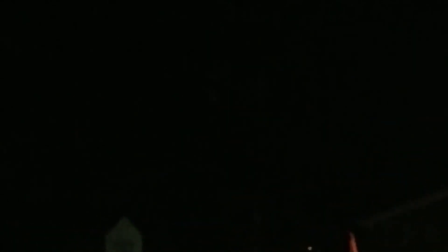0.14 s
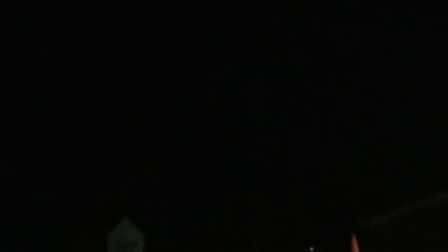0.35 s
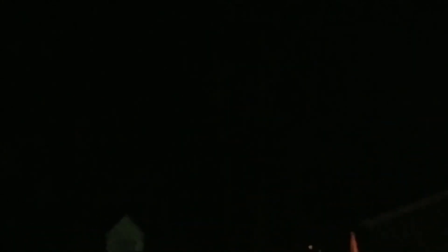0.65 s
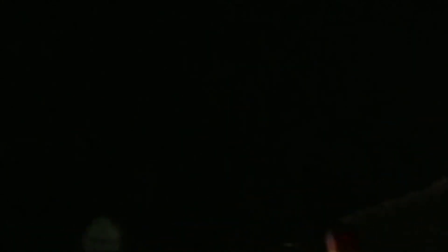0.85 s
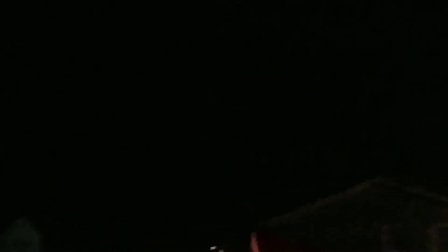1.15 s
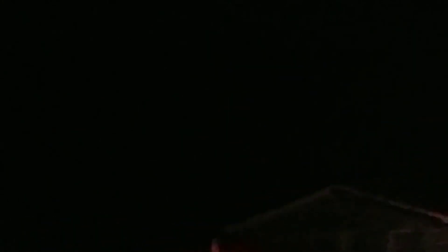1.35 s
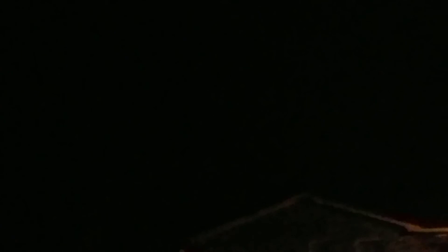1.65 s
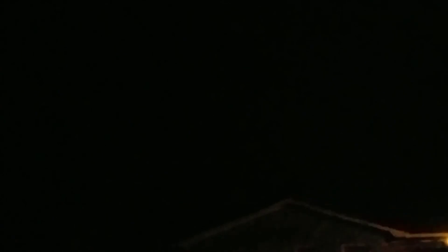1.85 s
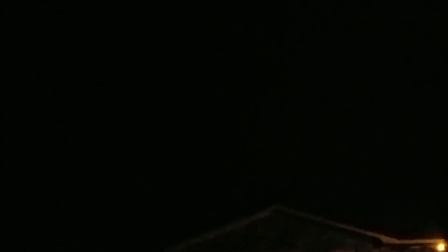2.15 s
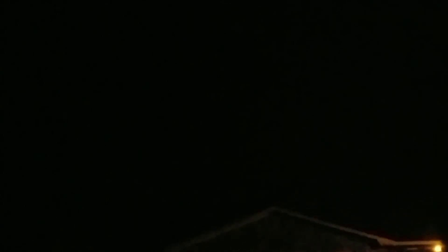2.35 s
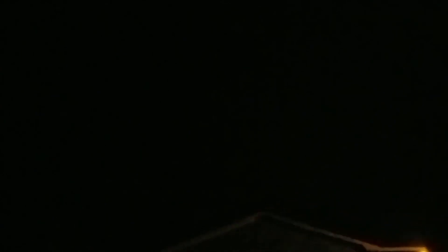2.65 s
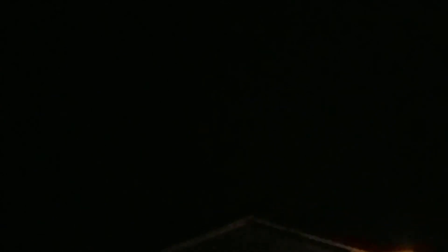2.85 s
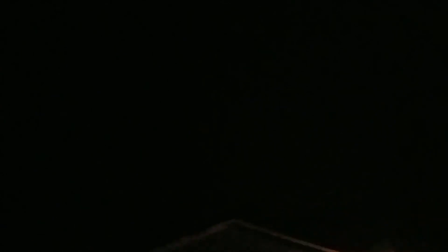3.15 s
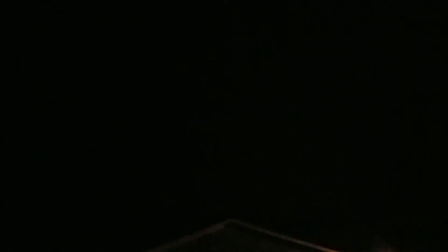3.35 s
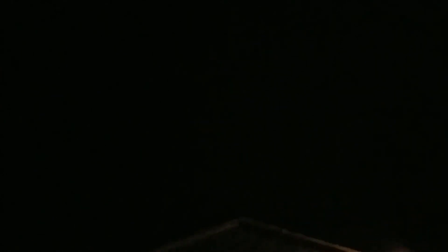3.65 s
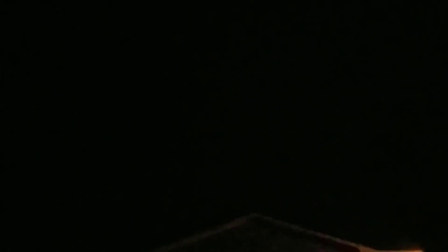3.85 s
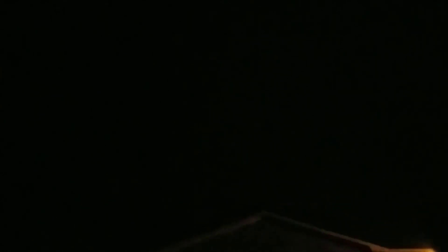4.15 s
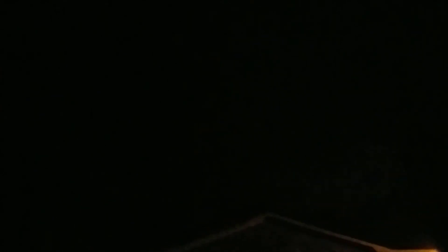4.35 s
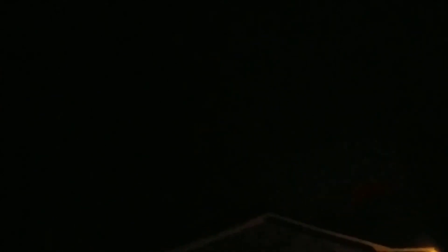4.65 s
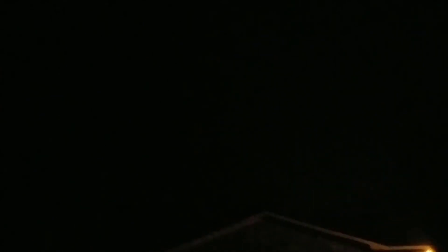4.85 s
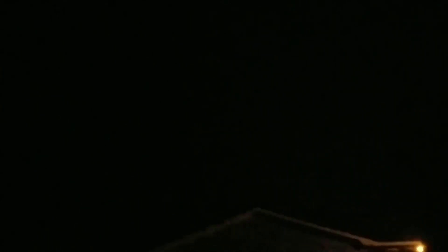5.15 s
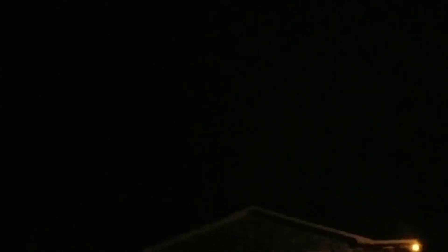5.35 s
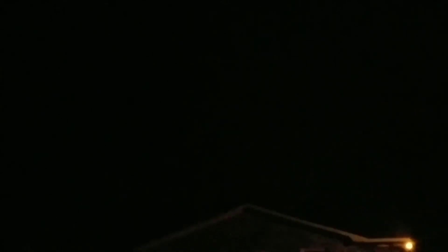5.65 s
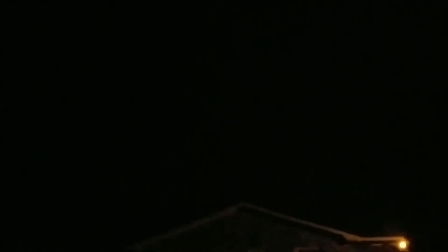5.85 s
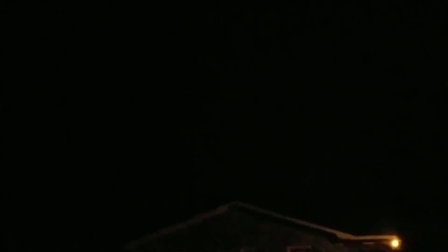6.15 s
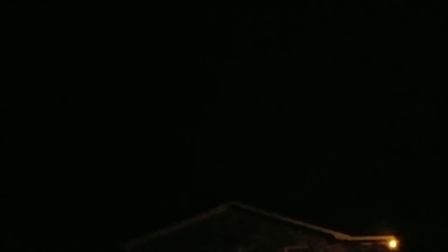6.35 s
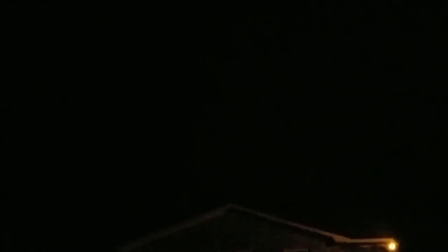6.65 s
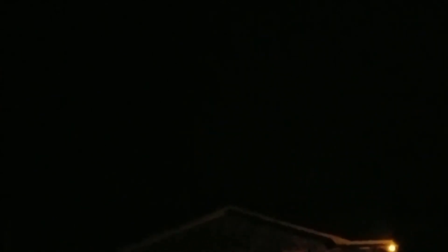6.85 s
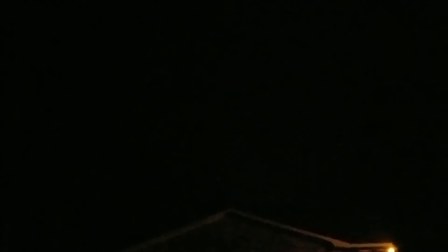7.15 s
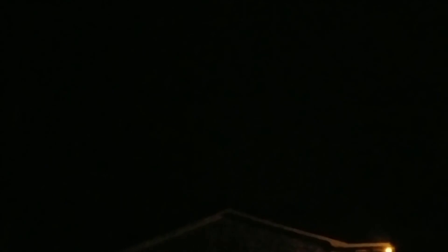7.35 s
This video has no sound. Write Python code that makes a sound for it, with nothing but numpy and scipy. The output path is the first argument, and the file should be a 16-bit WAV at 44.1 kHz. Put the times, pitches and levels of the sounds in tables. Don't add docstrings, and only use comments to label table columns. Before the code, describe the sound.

Night crickets and katydids pulse over a low hum and leaf hiss; two violent thunder cracks burst close by, with short rolling echoes.

```python
import sys
import numpy as np
from scipy import signal
from scipy.fft import rfft, irfft, next_fast_len
from scipy.io import wavfile

SR = 44100
rng = np.random.default_rng(int(sys.argv[2]) if len(sys.argv) > 2 else 0)


def volts(x):
    e = np.asarray(x, float) / 20
    return 10 ** e


def store_wav(level_fs):
    pcm = np.round(np.clip(np.atleast_2d(level_fs), -1, 1) * 32767)
    wavfile.write(sys.argv[1], SR, pcm.T.astype(np.int16))


N = 331191

# start_s, level_db
HUM_LEVEL = [(0.0, -44.5), (.45, -42.5), (1.1, -45.5), (1.75, -40), (2.15, -43), (2.45, -41), (2.85, -45.5),
             (3.3, -42.5), (5.5, -45.5), (6.8, -40.5), (7.2, -46.5), (7.51, -42)]
# frequency_hz, density_db (per Hz)
HUM_COLOUR = [(15, -49), (25, -13), (48, -15), (118, 1), (151, -8), (221, -11), (260, -16), (332, -20),
              (360, -25), (400, -27), (520, -66), (880, -120)]
# frequency_hz, density_db (per Hz)
HISS_COLOUR = [(200, -14.5), (380, -7.5), (760, -7), (1100, -8.5), (1500, -15), (2200, -13), (3600, -21.5),
               (4400, -28.5), (5500, -35.5), (6200, -21), (7900, -54.5), (8700, -24.5), (9500, -30),
               (15800, -27.5)]
# frequency_hz, likeness (-1 to 1)
NIGHT_LIKENESS = [(60, 0.97), (130, 1), (290, 0.89), (640, 0.68), (1410, 0.36), (3100, 0.33), (6820, 0.16),
                  (15000, .1)]
# pitch_hz, width_hz, level_db
MOTOR_DRONES = [
    (226.2, 19, -61.5),
    (333.3, 12, -65.5),
]
# start_s, level_db
MOTOR_PASSING = [
    (0, -1),
    (.5, 2.5),
    (1.9, 7),
    (2.4, -18),
    (3.0, -30),
]
# start_s, chirps_so_far (count)
CHIRPS = [
    (.005, 0),
    (3.98, 15),
    (7.47, 29),
    (7.72, 30),
]
# start_s, dip_db between chirps (deep when all keep time), octave_db of the nearest cricket
CHORUS = [(0, 2, -66), (.9, 4.5, -68.5), (1.5, 5, -71), (2.2, 3, -72), (2.75, 2.5, -68), (3.6, 3.5, -69),
          (5.3, 9, -77), (6.0, 4.5, -84), (7.0, 8.5, -78), (7.51, 7.5, -76)]
# start_s (middle of swell), level_db over their steady buzz
BUZZ_SWELLS = [(.03, 4.0), (.35, 2.5), (.8, 3.0), (1.07, 2.5), (1.43, 5), (1.92, 3.0), (2.13, 4.0),
               (2.35, 3.5), (2.7, 3), (3.1, 2.5), (3.34, 2), (4.5, 3), (4.7, 3), (6.231, 6.5), (6.75, 3.0),
               (7.21, 7)]
# start_s, length_s, level_db at the end, pitch_hz
RASP_PHRASES = [
    (-.4, 0.84, -77, 11200),
    (.7, 1.06, -73, 11050),
    (1.87, .2, -74, 11300),
    (2.33, 1.04, -80, 12300),
    (4.3, .55, -72, 11700),
    (5.5, 1.2, -72, 11200),
    (6.7, .9, -72.5, 11060),
]
# start_s, peak_db, length_s, softness_hz (top of the spectrum)
BLASTS = [
    (3.6596, 1.0, .0046, 2500),
    (4.8213, -.5, .0046, 1250),
]
# delay_s, level_db, left_lag_ms, dullness (factor on softness)
NEAR_ECHOES = [
    (0, -0.5, 0.41, 1.0),
    (.0054, -14, -0.047, 0.71),
    (.0094, -20, -0.12, 1),
    (0.0142, -6, -0.0068, 0.7),
    (0.021, -12, .05, .5),
    (.0290, -14, 0.31, 0.18),
]
# delay_s, level_db, left_lag_ms, dullness (factor on softness)
FAR_WALLS = [
    (0.084, -20, 0.2, 0.54),
    (0.121, -28, 0.26, 0.73),
    (0.154, -26, -.2, 0.57),
    (0.327, -33, 0.13, .4),
    (.395, -36, -.1, .4),
]
# frequency_hz, density_db (per Hz)
ROLL_COLOUR = [(20, -39.5), (40, -19), (97, -3), (150, -4.5), (200, -3), (320, -8.5), (450, -20),
               (640, -9.5), (950, -22), (1700, -25), (3800, -33.5), (6500, -51), (11000, -53), (15000, -57)]
# frequency_hz, likeness (-1 to 1)
ROLL_LIKENESS = [(60, 0.98), (130, 0.96), (290, 0.92), (640, 0.58), (1410, -0.26), (3100, -0.46),
                 (6820, 0.92), (15000, -0.14)]
ROLL_EDGES = [300, 1003, 2280]
# first_db, fall_db_per_s, rumble_db, rumble_fall_db_per_s, gather_s, wall_burst_db
ROLL_BANDS = [
    (-20, 57.5, -40, 6.5, 0.036, -20),
    (-20.5, 86, -47.5, 6.5, 0.005, 3),
    (-26, 66, -46.5, 10.5, 0.0017, -1.5),
    (-40, 81, -80, -1, 0.0089, 1),
]
# first_db, rumble_db, hills_db
ROLL_STRENGTH = [
    (1, -0.5, -2),
    (0, 2.5, -20),
]
# frequency_hz, density_db (per Hz)
SWELL_COLOUR = [(300, -11.5), (500, -10.5), (780, -5), (1100, -6.5), (1500, -7), (2100, -3.5), (2800, -16),
                (4500, -27), (7000, -53), (14000, -55)]
DUCK_DB = [
    19,
    10,
]


def in_time(rows):
    s, *columns = np.transpose(rows)
    return [np.interp(np.arange(N) / SR, s, column) for column in columns]


def rms_one(x):
    return x / np.sqrt(np.mean(x ** 2) + 1e-20)


def at_hz(points, hz):
    table_hz, values = np.array(points).T
    return np.interp(np.log(hz + 1), np.log(table_hz), values)


def coloured(x, spectrum, lag_ms=0.):
    size = next_fast_len(N)
    hz = np.arange(size // 2 + 1) * SR / size
    delay = np.exp(-2j * np.pi * hz * lag_ms / 1000)
    return irfft(rfft(x, size) * volts(at_hz(spectrum, hz)) * delay, size)[..., :N]


def diffuse(mid, side, spectrum, likeness):
    hz, alike = np.clip(np.array(likeness), [1, -.99], [SR, .99]).T
    mid = coloured(coloured(mid, spectrum), np.c_[hz, 10 * np.log10(1 + alike)])
    side = coloured(coloured(side, spectrum), np.c_[hz, 10 * np.log10(1 - alike)])
    return np.array([mid + side, mid - side]) / np.sqrt(2)


def drift(rate):
    r = np.exp(-80 * np.pi * rate / SR)
    slow = signal.lfilter([1], [1, -2 * r, r * r], rng.standard_normal(N // 40 + 2002))[2000:]
    return np.interp(np.arange(N) / 40, np.arange(len(slow)), rms_one(slow))


def night():
    hiss_db, hum_lag_ms = -53, .18
    white = rng.standard_normal((4, N))
    hum = rms_one(diffuse(white[0], white[1], HUM_COLOUR, NIGHT_LIKENESS))
    hum *= volts(in_time(HUM_LEVEL)[0] + 1.04 * drift(5.3))
    hiss = rms_one(diffuse(white[2], white[3], HISS_COLOUR, NIGHT_LIKENESS))
    hiss *= volts(hiss_db + 0.6 * drift(7.4))
    left, right = hum * volts([[-.4], [.4]]) + hiss
    return np.array([np.roll(left, round(hum_lag_ms * SR / 1000)), right])


def singers(hz, spread_hz, pulses_per_s, duty, wobble_hz, count):
    out = np.zeros((2, N))
    for place in np.linspace(-1, 1, count):
        rate, lag, pan = rng.normal(0, 1, 3)
        turn = 2 * np.pi * np.cumsum(hz + spread_hz * place + wobble_hz * drift(80)) / SR
        pulse_rate = pulses_per_s * (1 + 0.074 * rate + 0.05045 * drift(4.78))
        beat = np.cumsum(pulse_rate) / SR % 1
        stroke = np.sin(np.pi * np.clip(beat / duty, 0, 1)) * volts(1.14 * drift(1.75))
        tone = np.sin([turn, turn + 3 * lag + 1.12 * drift(22)])
        out += stroke * tone * volts([[2.8 * pan], [-1.5 * pan]])
    return rms_one(out)


def crickets():
    cricket_db, octave_lead, octave_dip_db = -56, .08, 19.5
    (chirp,), (dip_db, octave_db) = in_time(CHIRPS), in_time(CHORUS)
    level_db = cricket_db - dip_db * np.sin(np.pi * chirp) ** 2
    octave_db = octave_db - octave_dip_db * np.sin(np.pi * (chirp + octave_lead)) ** 2
    chorus = volts(level_db + 4) * volts([[1.5], [-1.5]]) * singers(7021, 260, 44, 1.0, 110, count=7)
    nearest = volts(octave_db + 2) * volts([[1], [-1]]) * singers(13950, 60, 44, 1, 60, count=3)
    others = volts(level_db - 16.5) * singers(14300, 450, 44, 1.0, 300, count=3)
    return chorus + nearest + others


def low_katydids():
    buzz_db, swell_s, t = -59.0, 0.039, np.arange(N) / SR
    level_db = buzz_db + sum(db * np.exp(-.5 * ((t - s) / swell_s) ** 2) for s, db in BUZZ_SWELLS)
    return volts(level_db + 2.5) * singers(2718, 240, 128, 0.95, 170, count=6)


def trill():
    return volts(-65) * singers(4692, 170, 60, 0.93, 82, count=5)


def high_katydids():
    growth_db, edge_s, t = 3, 0.034, np.arange(N) / SR
    gain, pitch_hz = np.zeros(N), np.full(N, RASP_PHRASES[0][3], float)
    for s, length, db, hz in RASP_PHRASES:
        left_s = s + length - t
        edges = np.clip(np.minimum(t - s, left_s) / edge_s, 0, 1)
        gain += edges * volts(db - growth_db * np.clip(left_s / length, 0, 1))
        pitch_hz[t >= s] = hz
    return gain * volts(3.0) * singers(pitch_hz, 300, 150, 0.92, 400, count=4)


def motor():
    out = np.zeros(N)
    for hz, width_hz, level_db in MOTOR_DRONES:
        r, tone = np.exp(-np.pi * width_hz / SR), rng.standard_normal(N)
        for stage in range(2):
            tone = signal.lfilter([1, 0, -1], [1, -2 * r * np.cos(2 * np.pi * hz / SR), r * r], tone)
        out += volts(level_db) * rms_one(tone)
    return out * volts(in_time(MOTOR_PASSING)[0])


def n_wave(phase):
    suck = 1.7 * np.sin(np.pi * phase.clip(0, 1) ** 1.3) ** 2 * phase
    wave = 1 - 1.6 * phase - suck + .6 * phase ** 4
    return np.where((phase > 0) & (phase < 1), wave, 0)


def blasts():
    out, t = np.zeros((2, N)), np.arange(800) / SR
    for s, peak_db, length, soft_hz in BLASTS:
        for delay, echo_db, lag_ms, dull in NEAR_ECHOES + FAR_WALLS:
            at = round((s + delay) * SR)
            smooth = signal.butter(3, np.clip(soft_hz * dull, 100, 9000), fs=SR, output="sos")
            for channel, late_ms in enumerate([max(lag_ms, 0), max(-lag_ms, 0)]):
                wave = n_wave((t - late_ms / 1000) / length)
                out[channel, at:at + len(t)] += volts(peak_db + echo_db) * signal.sosfilt(smooth, wave)
    return out


def yard(x):
    ring_hz, width_hz, ring_db = 654, 59, 9
    r = np.exp(-np.pi * width_hz / SR)
    poles = [1, -2 * r * np.cos(2 * np.pi * ring_hz / SR), r * r]
    ring = signal.lfilter(np.array([1, 0, -1]) * (1 - r * r) / 2, poles, x + 1e-18)
    return x + volts(ring_db) * ring


def roll_level(t, first_db, fall, rumble_db, rumble_fall, gather, wall_db):
    hills_delay_s, hills_spread_s, hills_over_rumble_db = 0.778, 0.063, -4.5
    surge_s, surge_rise_s = 0.0058, 0.0016
    power = 0
    for blast, (strong_db, linger_db, hills_db) in zip(BLASTS, ROLL_STRENGTH):
        since = np.maximum(t - blast[0], 0)
        hills = np.exp(-.5 * ((since - hills_delay_s) / hills_spread_s) ** 2)
        hills *= volts(hills_over_rumble_db + hills_db)
        rumble = volts(rumble_db + linger_db - rumble_fall * since) * (1 + hills)
        late = [np.maximum(since - wall[0], 0) for wall in FAR_WALLS]
        bursts = sum((1 - np.exp(-u / surge_rise_s)) * np.exp(-u / surge_s) for u in late)
        onset = (1 + volts(wall_db) * bursts) * np.clip(since / gather, 0, 1)
        power = power + onset ** 2 * (volts(first_db + strong_db - fall * since) ** 2 + rumble ** 2)
    return np.sqrt(power)


def from_blast_side(x, spectrum):
    return np.array([coloured(x, spectrum, .36), coloured(x, spectrum)])


def late_swell(far, mid, side, lumps):
    peak_s, hold_s, peak_db, rise_db_per_s, fall_db_per_s = 5.553, 0.16, -35, 124, 61
    t = np.arange(N) / SR
    echo = 0.57 * from_blast_side(far, SWELL_COLOUR)
    echo += 0.49 * diffuse(mid, side, SWELL_COLOUR, ROLL_LIKENESS)
    level_db = peak_db - rise_db_per_s * np.maximum(peak_s - t, 0)
    level_db -= fall_db_per_s * np.maximum(t - peak_s - hold_s, 0)
    return volts(level_db + lumps) * rms_one(echo)


def roll(per_s, spread_db):
    share_first, share_late, share_fade_s = 1, 0.077, 0.016
    t, out = np.arange(N) / SR, np.zeros((2, N))
    size = volts(spread_db * np.minimum(rng.exponential(1, (4, N)), 5)) * rng.choice([-1, 1], (4, N))
    front, mid, side, far = rms_one(size * (rng.random((4, N)) < per_s / SR))
    ahead = from_blast_side(front, ROLL_COLOUR)
    around = diffuse(mid, side, ROLL_COLOUR, ROLL_LIKENESS)
    first_s, second_s = BLASTS[0][0], BLASTS[1][0]
    since = np.maximum(np.where(t < second_s, t - first_s, t - second_s), 0)
    share = np.clip(share_late + (share_first - share_late) * np.exp(-since / share_fade_s), 0, 1)
    echoes = np.sqrt(share) * ahead + np.sqrt(1 - share) * around
    lumps = 1.44 * drift(22)
    edges = [20, *ROLL_EDGES, 16500]
    for k, (low, high, rule) in enumerate(zip(edges, edges[1:], ROLL_BANDS)):
        band = signal.sosfilt(signal.butter(2, [low, high], "band", fs=SR, output="sos"), echoes)
        level = roll_level(t, *rule) * volts(0.27 * drift(44) + lumps)
        out += level * rms_one(band) * (-1) ** k
    return (out + late_swell(far, side, mid, lumps)) * volts([[-.7], [.7]])


def gain_control():
    attack_s, release_s = 0.17, 0.49
    pulled_db = 0
    for blast, db in zip(BLASTS, DUCK_DB):
        since = np.maximum(np.arange(N) / SR - blast[0], 0)
        pulled_db = pulled_db + db * (1 - np.exp(-since / attack_s)) * np.exp(-since / release_s)
    return volts(-pulled_db)


def scene():
    dark = night() + crickets() + low_katydids() + trill() + high_katydids()
    thunder = yard(blasts()) + roll(per_s=4000, spread_db=3.0)
    return thunder + gain_control() * dark + motor()


def band_limit(x):
    return signal.sosfilt(signal.butter(12, 15790, fs=SR, output="sos"), x)


def record(dry):
    overload = .95
    x = signal.sosfilt(signal.butter(1, 35, "high", fs=SR, output="sos"), dry)
    x = x / (1 + np.abs(x / overload) ** 12) ** (1 / 12)
    x = signal.sosfilt(signal.cheby2(14, 60, 16150, fs=SR, output="sos"), x)
    return band_limit(x)


dry = scene()
out = record(dry)
store_wav(out)
```